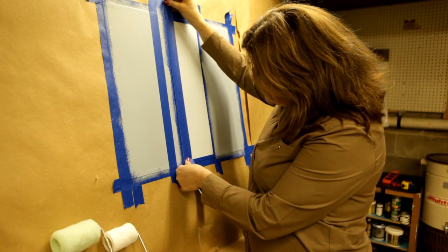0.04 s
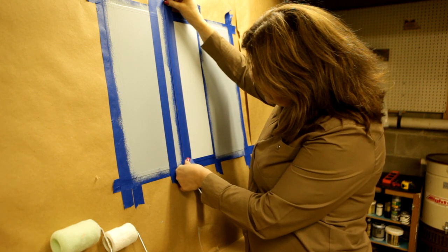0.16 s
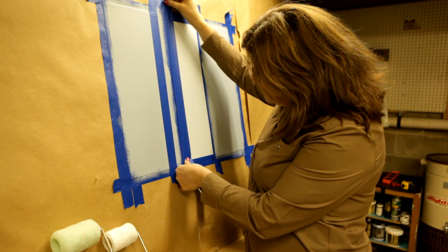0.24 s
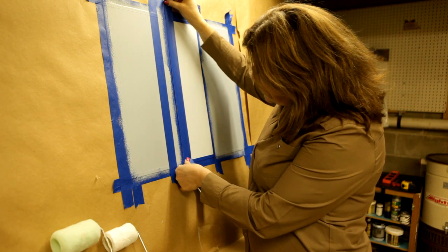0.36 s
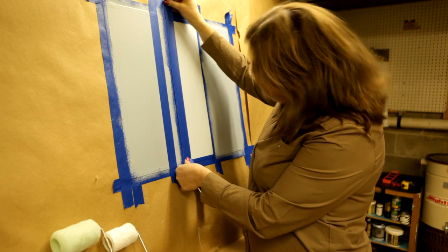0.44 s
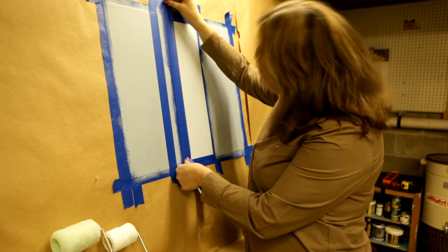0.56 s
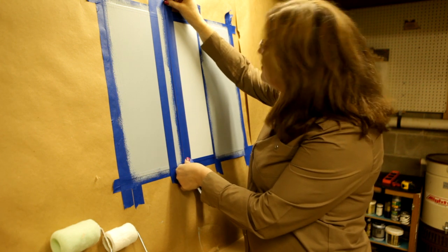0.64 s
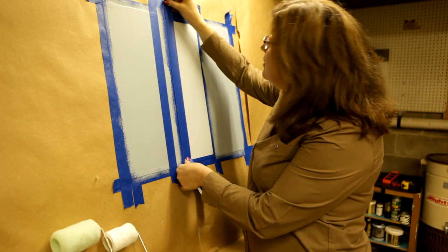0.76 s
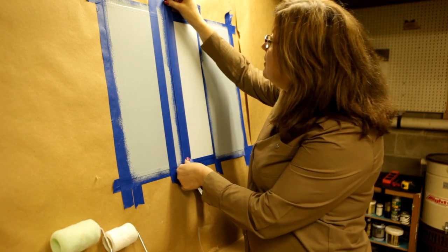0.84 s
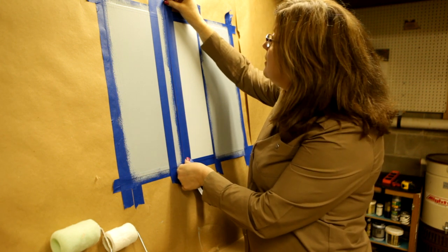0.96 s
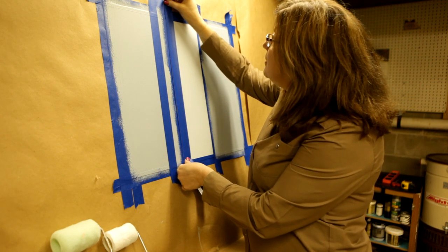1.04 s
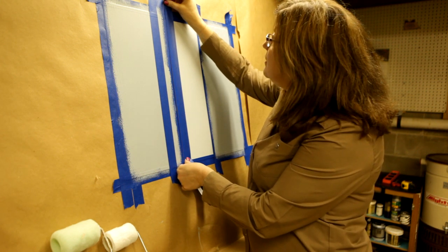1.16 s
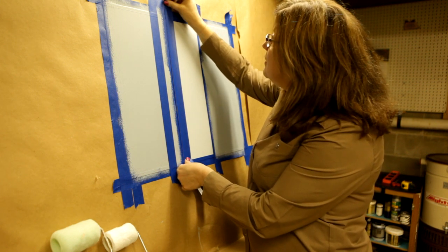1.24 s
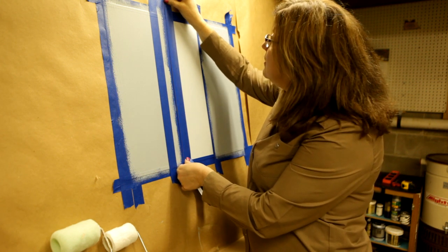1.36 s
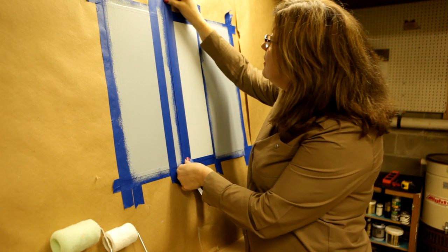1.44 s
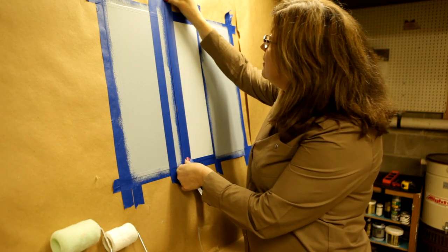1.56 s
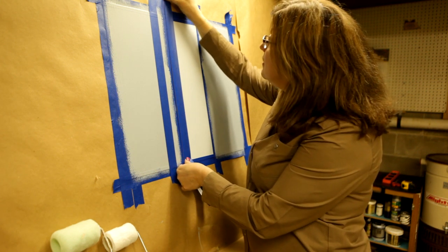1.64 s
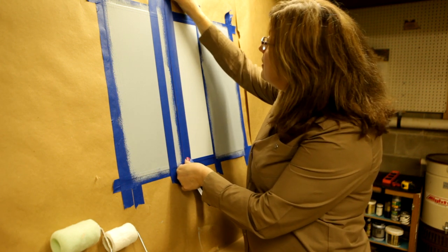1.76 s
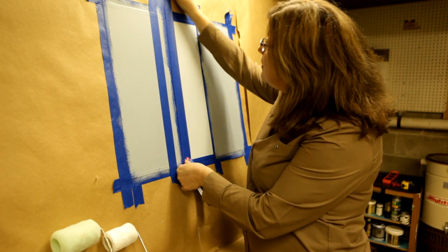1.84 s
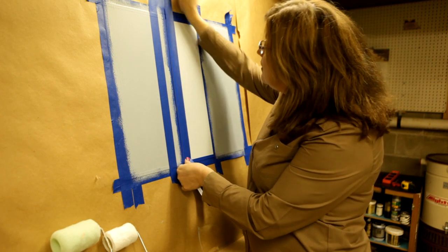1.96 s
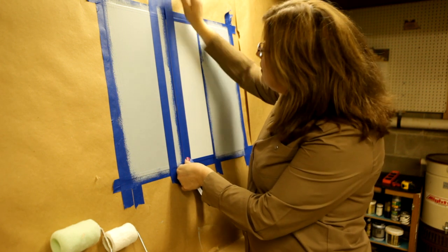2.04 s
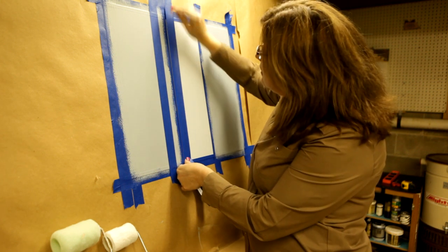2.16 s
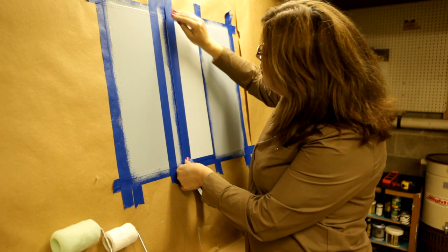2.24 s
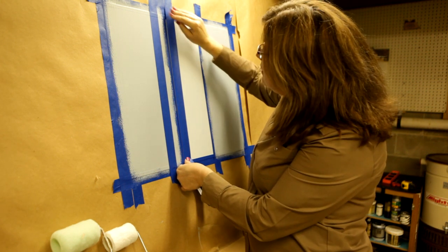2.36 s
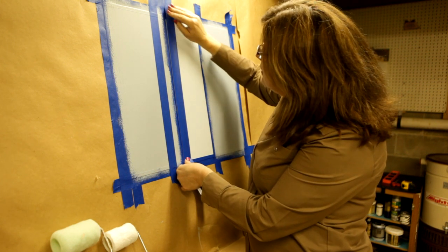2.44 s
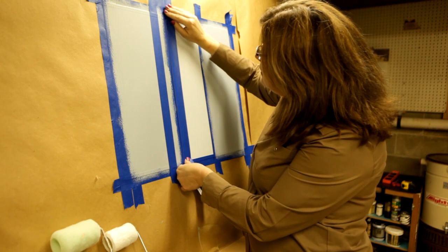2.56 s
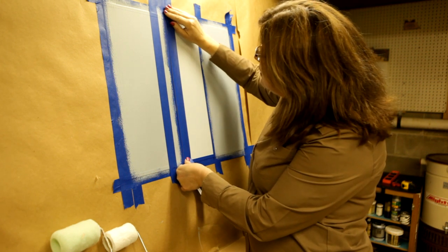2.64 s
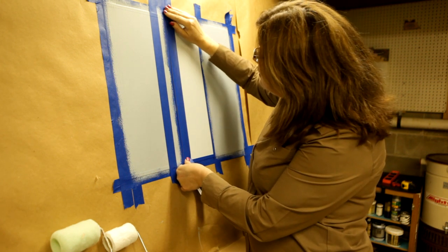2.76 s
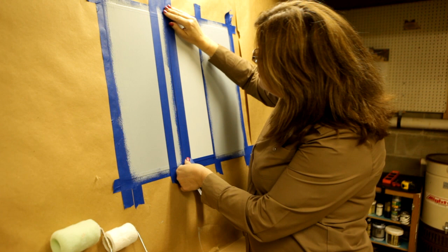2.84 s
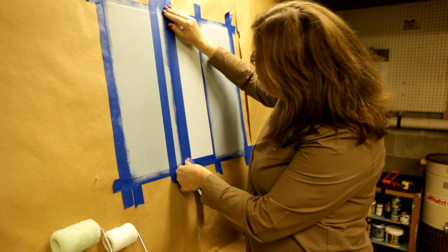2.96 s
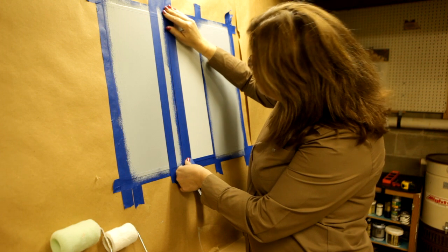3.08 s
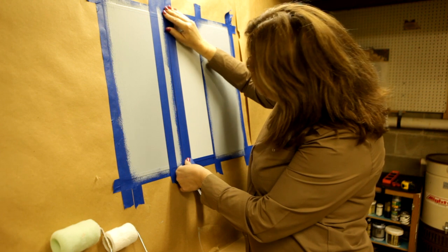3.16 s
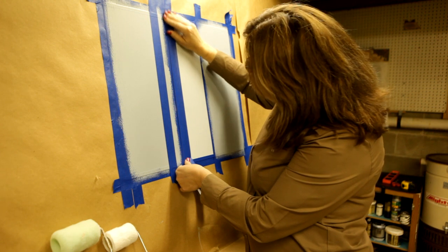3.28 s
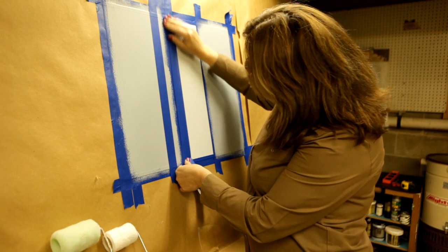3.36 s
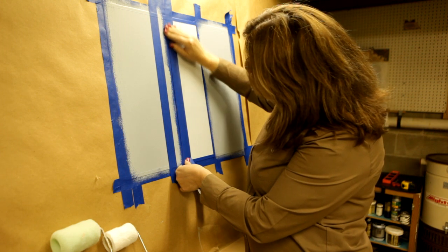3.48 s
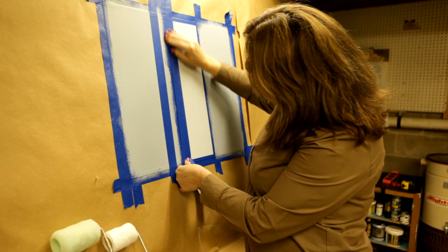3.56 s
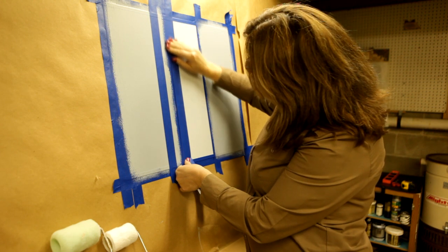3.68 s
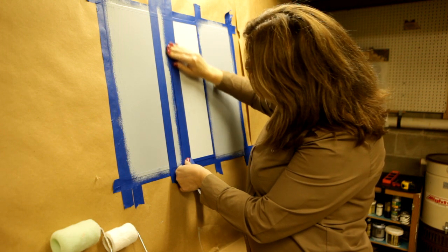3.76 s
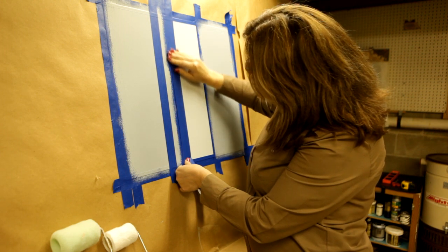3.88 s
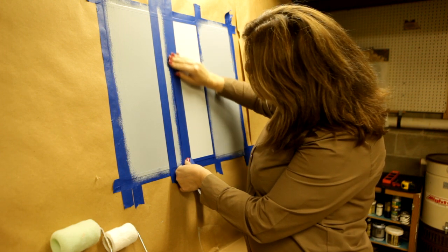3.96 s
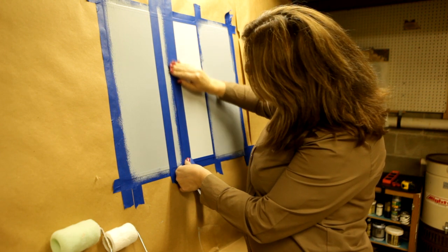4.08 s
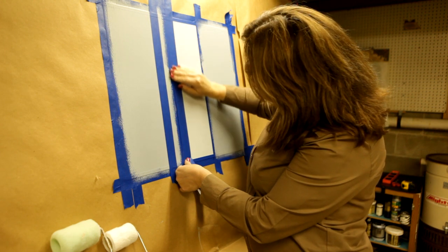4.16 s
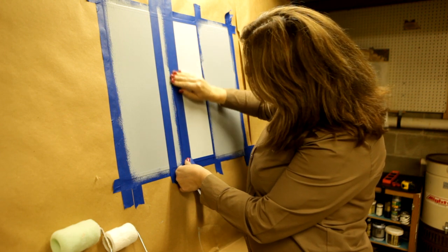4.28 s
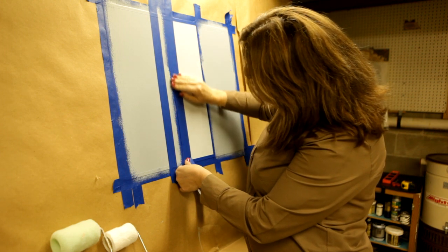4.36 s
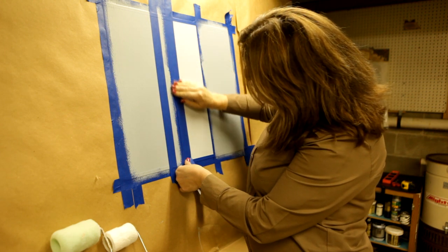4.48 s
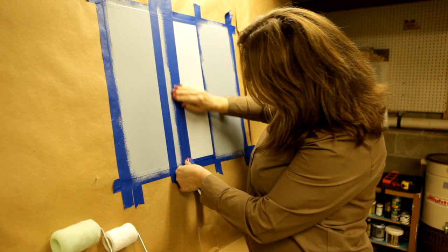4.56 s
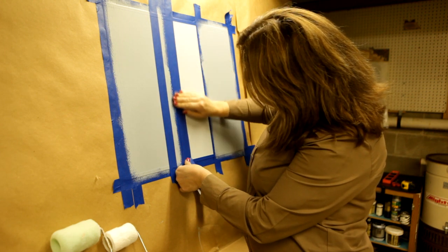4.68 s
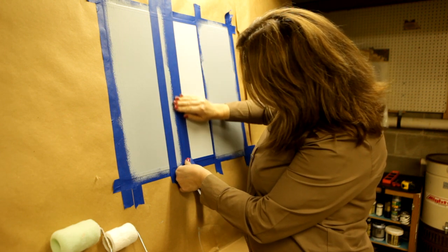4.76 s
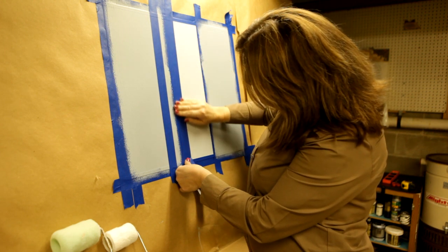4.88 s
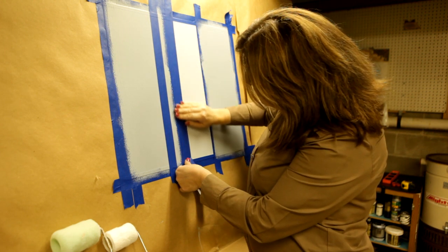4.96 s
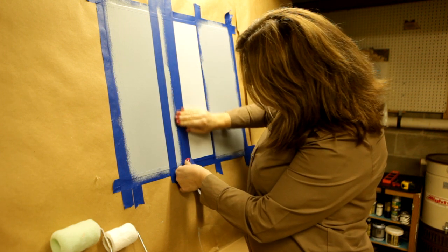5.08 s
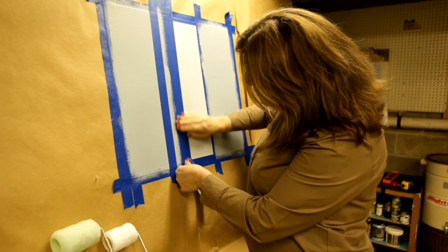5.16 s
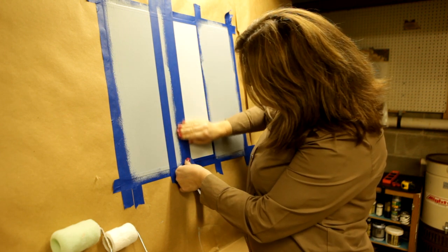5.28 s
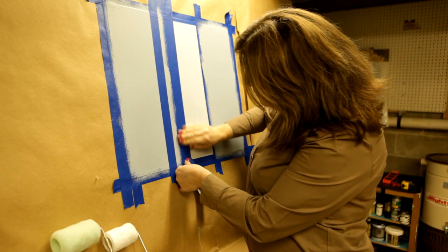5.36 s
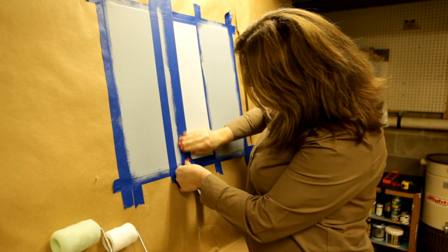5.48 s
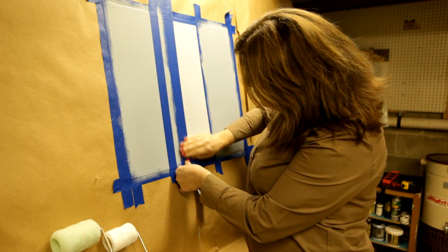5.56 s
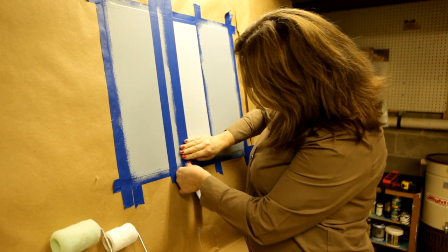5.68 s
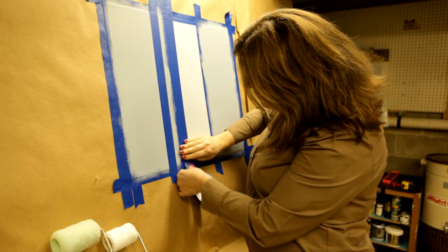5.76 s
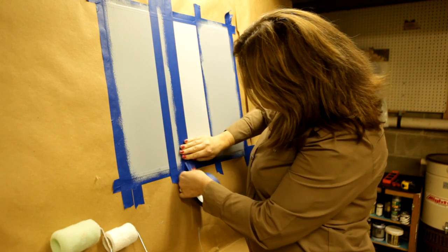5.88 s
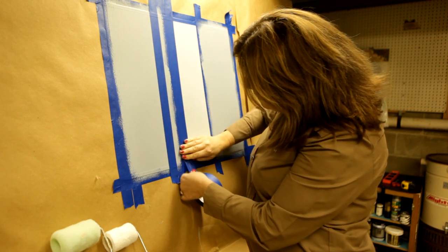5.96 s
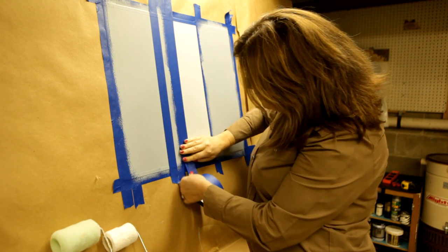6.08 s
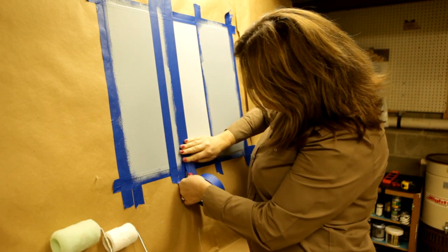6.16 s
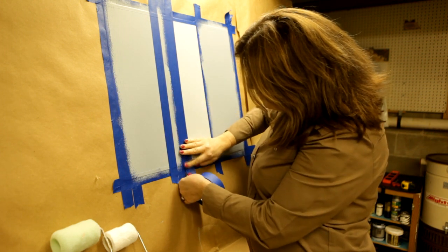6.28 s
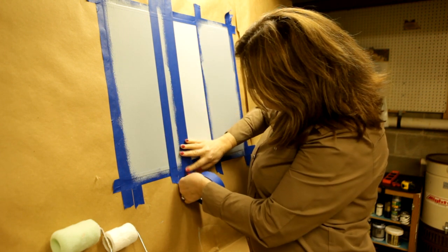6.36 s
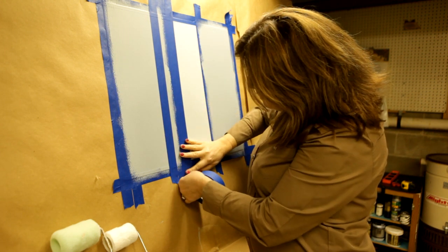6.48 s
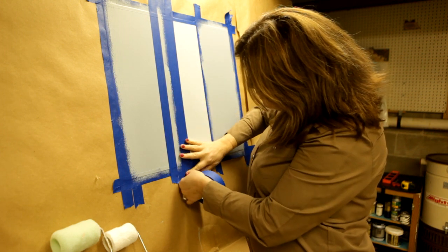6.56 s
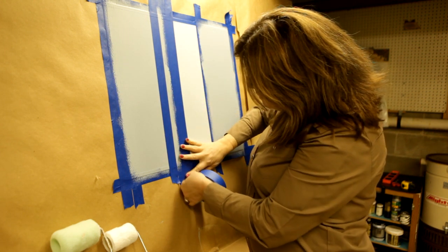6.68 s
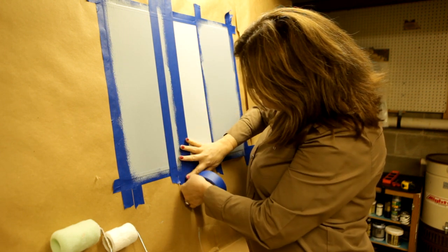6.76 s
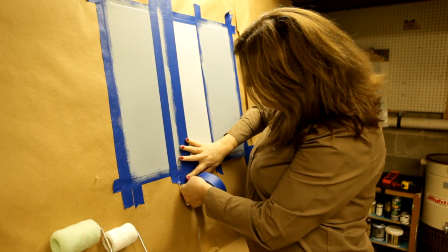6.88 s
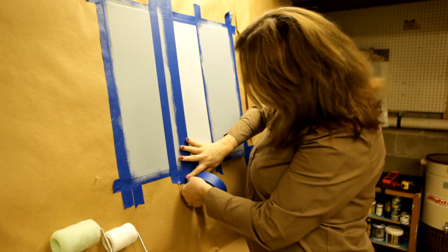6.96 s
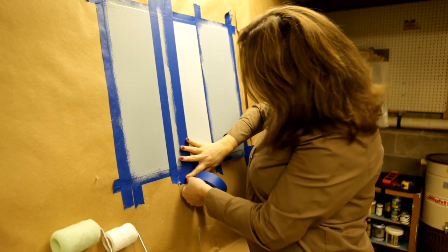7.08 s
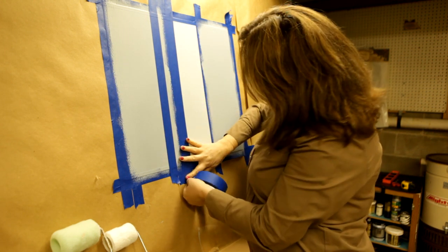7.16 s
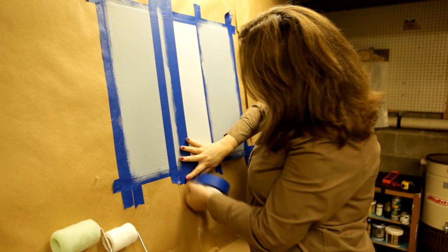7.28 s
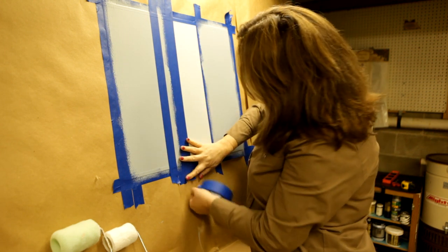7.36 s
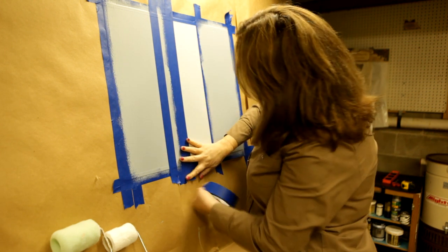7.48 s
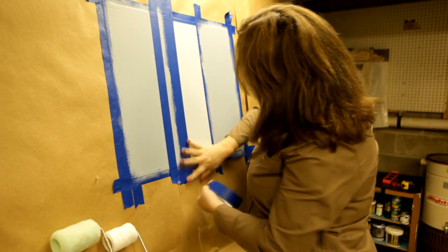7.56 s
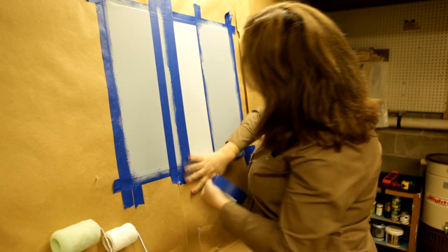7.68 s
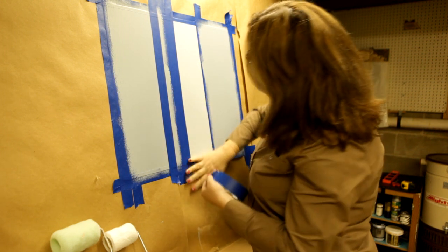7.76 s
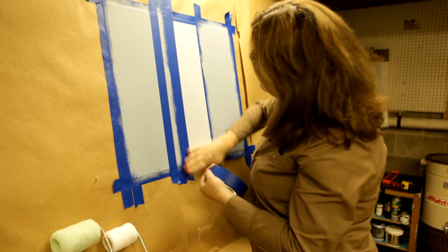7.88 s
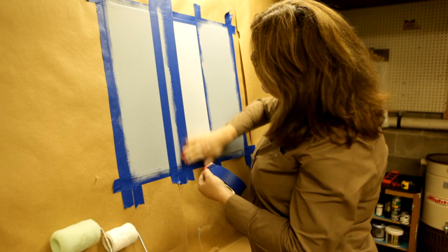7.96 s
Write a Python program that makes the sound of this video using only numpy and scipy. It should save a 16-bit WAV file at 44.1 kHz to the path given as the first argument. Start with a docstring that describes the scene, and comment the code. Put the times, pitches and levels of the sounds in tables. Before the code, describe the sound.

In a quiet basement workshop, a hand touches and presses masking tape with small sticky ticks and soft wall knocks, then rubs down it in one long dry swish. A sharp click pops, short rubs follow, and the tape tears with a quick crisp rip. Final scuffs grow louder. A mono microphone a few steps away picks up faint hum and hiss.

```python
"""A hand smooths paper masking tape down a hollow wall in a basement workshop; then the tape tears.
Rubbing: one stream of noise and slips drives the colours of skin, wall board, palm and grit.
Tape: glue snaps and parting fibres are ticks with a short ring; the tear rings two modes of the strip.
Wall: knocks ring the board's modes and a low mode drones. Behind: paper crackle, air, hiss and hum.
A mono microphone with gain control listens from a few steps away."""
import sys
import numpy as np
from scipy import signal
from scipy.io import wavfile
from scipy.ndimage import uniform_filter1d, minimum_filter1d

SR = 44100
rng = np.random.default_rng(int(sys.argv[2]) if len(sys.argv) > 2 else 0)


def put_to_file(sound):
    """Save the sound as 16-bit audio at rate SR, in the file named by the first command-line argument."""
    columns = np.atleast_2d(sound).T  # one column per channel
    safe = np.clip(columns, -1, 1)
    whole_steps = np.round(safe * 32767)
    wavfile.write(sys.argv[1], SR, whole_steps.astype(np.int16))


N = 354123

# Colour of skin on crepe paper. Each row: frequency in Hz, relative level in dB.
SKIN_COLOUR = [(1470, -34.5), (2500, -11.5), (2800, -7.5), (3200, -4.5), (4050, -4), (7540, 1.5),
               (8690, -3), (11000, -24.5), (14300, -48), (22000, -120)]
# Colour of the wall board under the hand. Each row: frequency in Hz, relative level in dB.
BOARD_COLOUR = [(50, -29), (110, 11), (250, 11.5), (500, 14.5), (850, 8), (1200, -2.5), (1800, -41)]
# Colour of the palm's broad contact. Each row: frequency in Hz, relative level in dB.
PALM_COLOUR = [(350, -39), (750, 0), (1200, -1.5), (2000, 3), (3000, 7), (4500, -12)]
# Colour of the finest paper ridges. Each row: frequency in Hz, relative level in dB.
GRIT_COLOUR = [(8000, -10), (9500, 6.5), (10800, 3.5), (13000, 3), (14300, 4), (15200, -35), (16000, -27.5)]
# Long stroke down the strip. Each row: time in seconds, friction in dB, palm contact in dB re friction.
LONG_STROKE = [(3.1, -69, -12), (3.16, -59, -5), (3.18, -50.5, -8), (3.28, -38, -14), (3.58, -37.5, -11.5),
               (3.89, -43.5, -11.5), (4.1, -39.5, -13.5), (4.29, -46.5, -10), (4.36, -41.5, -13),
               (4.71, -41, -13.5), (4.85, -46.5, -10.5), (5.04, -41, -11), (5.31, -38.5, -12.5),
               (5.44, -43, -9), (5.55, -38.5, -14.5), (5.62, -41, -5.5)]
# Short touches. Each row: peak time, rise and fall in seconds (to 10 dB under the friction peak),
# friction in dB, palm contact in dB re friction, grit in dB re friction.
TOUCHES = [(.03, 0.015, .05, -59, -15, -17), (.19, 0.08, 0.056, -55, -11, -21),
           (.39, 0.089, 0.051, -58.5, -18, -20), (.515, 0.11, 0.14, -53.5, -4, -23),
           (.75, 0.053, 0.25, -59, -8, -14), (1.125, 0.041, 0.055, -40.5, -12, -17),
           (1.222, 0.048, 0.017, -42.5, -10, -9), (1.278, 0.029, 0.08, -42.5, -6, -24),
           (1.515, 0.015, 0.23, -45, -9.5, -20), (1.875, .16, 0.088, -36.5, -8, -21),
           (2.1, 0.23, 0.2, -54, -6, -20), (2.63, .1, .1, -60.5, -7, -15),
           (2.86, .08, .08, -63.5, -3.5, -8), (3.08, .06, 0.08, -58.5, -6, -13),
           (5.675, .04, 0.075, -42, -6, -22), (5.77, .07, 0.096, -36, -11, -33),
           (5.85, 0.053, 0.25, -38.5, -14.5, -20), (5.98, 0.029, 0.037, -33, -10.5, -22),
           (6.1, .1, 0.073, -35.5, -18, -18), (6.2, 0.0089, 0.21, -52, -8, -21),
           (6.385, 0.11, 0.041, -44, -13, -14), (6.585, 0.073, 0.059, -44.5, -7, -22),
           (6.75, 0.073, 0.088, -33, -13, -15), (7.03, 0.059, 0.31, -47.5, -5, -31),
           (7.46, 0.16, .1, -49, -7.5, -22), (7.6, 0.046, 0.087, -31, -13, -15),
           (7.691, 0.067, 0.033, -32, -14.5, -14.5), (7.85, .1, 0.061, -34, -11, -15),
           (7.94, 0.1, .08, -31, -18, -17), (8.02, 0.074, .05, -22, -23, -16.5)]
TOUCH_ROUNDNESS = 1.35
STROKE_GRIT_DB, STROKE_REF_DB, GRIT_DB_PER_DB = -15.5, -41, .6
# Share of a touch's swing in dB; the board also rumbles as the palm leans in.
BOARD_FOLLOW, PALM_FOLLOW, GRIT_FOLLOW = 0.55, 0.71, 1.25
BOARD_DB_PER_PALM_DB = 2.18

# Glue lets go. Each row: start in seconds, relative ring peak in dB, ring in Hz.
GLUE_SNAPS = [(.458, -39.5, 2730), (.512, -40, 6000), (.734, -47, 6440), (1.0674, -30.5, 7000),
              (1.2164, -25.5, 6200), (1.2186, -36, 3530), (1.2533, -18, 5800), (1.2552, -20, 5300),
              (1.2578, -26, 5600), (1.2602, -27, 7500), (1.3176, -32.5, 5750), (1.507, -36, 5640),
              (1.7605, -32, 2930), (2.325, -44, 7600), (5.6925, -18, 5850), (5.696, -21, 4000),
              (5.9466, -27, 7000), (5.9478, -25, 7500), (5.9492, -3.5, 6300), (5.9526, -7, 7100),
              (6.1905, -31, 4850), (6.6189, -28, 5950), (6.6224, -30, 3950), (6.939, -35, 7050),
              (7.2367, -16, 7260), (7.5428, -29, 6350), (7.8402, -28, 7100)]
# Paper fibres part. Each row: start in seconds, relative ring peak in dB, ring in Hz.
FIBRE_SNAPS = [(7.2327, -22, 7350), (7.2402, -17, 7600), (7.267, -10, 4050), (7.2701, -9, 6000),
               (7.288, -10.5, 4200), (7.303, -12, 6350), (7.3063, -13, 6800)]
# Colour of the wide tick in a snap. Each row: frequency in Hz, relative level in dB.
TICK_COLOUR = [(100, -58), (600, -22), (1700, -12), (3000, -6), (4500, -0.5), (6700, 4.5), (10000, -6.5),
               (12000, -10.5), (15500, -13.5)]
GLUE_TICK_DB, FIBRE_TICK_DB = 1.5, -8.5  # tick energy re ring
# The tape tears. Each row: time in seconds, relative force in dB, low ring of the free strip in
# dB re force, high ring in Hz.
TEAR = [(7.223, -25, -12, 7600), (7.228, -23.5, -19, 7640), (7.245, -24.5, -19, 7600),
        (7.262, -20.5, -6, 6800), (7.267, -26.5, 1, 6040), (7.276, -21, -9, 6300), (7.29, -23.5, 1, 6400),
        (7.308, -20.5, -7, 6500), (7.313, -28, -4, 6700)]
# Colour of the tear's noise. Each row: frequency in Hz, relative level in dB.
TEAR_COLOUR = [(100, -40), (250, -19), (800, -16), (1400, -11), (2100, -13), (3000, -7), (6000, -16.5),
               (9000, -8.5), (11000, -12.5), (15500, -18)]
STRIP_HZ = 4030
TAPE_DB = 3  # gain on snaps, fibres and tear

# Hand, nail or roll knocks the wall. Each row: start in seconds, relative level in dB,
# best excited frequency in Hz (harder is higher).
KNOCKS = [(.46, -44.5, 705), (0.51, -39, 524), (.545, -47, 418), (.935, -48, 550), (1.218, -35, 1710),
          (1.254, -31, 1510), (1.262, -46, 200), (1.299, -38.5, 152), (1.505, -37, 442), (1.511, -37, 71),
          (1.538, -35, 209), (1.61, -40, 201), (5.62, -43, 90), (5.691, -37, 75), (5.693, -25, 1380),
          (5.949, -39, 250), (6.62, -27, 1450), (6.665, -36.5, 250), (6.69, -40, 120), (6.729, -35, 1300),
          (6.78, -33, 1300), (6.938, -33, 151), (7.01, -33, 577), (6.985, -39.5, 400), (7.045, -32, 645),
          (7.075, -39.5, 250), (7.1, -43, 500), (7.225, -31, 247), (7.543, -38, 205)]
# Modes of the board. Each row: frequency in Hz, relative level in dB, t60 in seconds.
WALL_MODES = [(72, -1, 0.33), (100, 2, 0.29), (147, -0.2, 0.3), (209.7, -4.4, 0.44), (273, 2, 0.24),
              (436, 1.8, 0.18), (509, -5.3, 0.19), (695, -1, 0.29), (1381, -6, 0.15), (1630, 4.5, .05)]
MODE_OCTAVE_LOSS_DB = 19  # a mode one octave off is this much weaker
# Board drone under the long stroke. Each row: time in seconds, level in dB.
DRONE = [(3.5, -72), (4.4, -64.5), (4.76, -58.5), (4.9, -68.5), (5.4, -63), (5.6, -67)]
DRONE_HZ, DRONE_RISE_HZ_PER_S = 344, 31

# Decay of the room. Each row: frequency in Hz, t60 in seconds.
ROOM_T60 = [(200, 0.43), (1500, 0.51), (6000, 0.38), (13000, 0.26)]
# Near surfaces. Each row: delay in seconds, reflection in dB.
ECHOES = [(.0012, -14.5), (.0058, -10.5), (.0075, -29.5), (0.0107, -18), (0.0137, -12), (.0165, -30),
          (0.021, -8)]
CRACKLES_PER_S, CRACKLE_DB = 30, -67.5
# Colour of room air and microphone hiss. Each row: frequency in Hz, relative level in dB.
AIR_COLOUR = [(20, -5), (36, -2), (70, 2.5), (119, 1), (173, -4.5), (313, -8.5), (722, -13), (1410, -13.5),
              (3000, -16), (6730, -12), (9500, -19.5), (13200, -23.5), (14200, -62)]
AIR_DB = -58.5  # rms before mottling
# Mains hum and motor. Each row: frequency in Hz, level in dB, rms waver in dB.
HUM = [(41, -67, -1), (120.3, -68, 0), (243, -70.5, 2.5), (293, -79.5, 4.5), (348, -73.5, 0.5),
       (483, -76.5, 2), (590, -85, 6.5), (711, -75.5, -3.5)]
CEILING, EDGE_HZ = .8, 15600


def amp(db):
    """Amplitude of a level in dB."""
    return 10 ** (np.asarray(db) / 20)


def evened(x):
    """Scale to rms 1."""
    return x / np.sqrt(np.mean(x ** 2) + 1e-20)


def read(points, hz):
    """Interpolate a table over log frequency."""
    f, value = np.transpose(points)
    return np.interp(np.log(hz + 1), np.log(f + 1), value)


def add(mix, start_s, sound):
    """Add a sound in place, cut at the end of the mix."""
    part = mix[round(start_s * SR):][:len(sound)]
    part += sound[:len(part)]


def coloured(x, points):
    """Causal minimum-phase filter with the given spectrum; rms 1."""
    hz = abs(np.fft.fftfreq(8192, 1 / SR))
    log_gain = np.log(amp(np.maximum(read(points, hz), -90)))
    taps = np.fft.ifft(np.exp(np.conj(signal.hilbert(log_gain)))).real[:4096]
    return evened(signal.oaconvolve(x, taps)[:len(x)])


def resonate(x, hz, width_hz):
    """A resonance of gain 1 that follows the curve hz: shift to 0 Hz, smooth, shift back."""
    turn = np.exp(2j * np.pi * np.cumsum(hz * np.ones(len(x))) / SR)
    r = np.exp(-np.pi * width_hz / SR)
    return 2 * (turn * signal.lfilter([1 - r], [1, -r], x / turn)).real


def drift(count, seconds):
    """Slow chance of rms 1: noise averaged twice."""
    size = max(int(seconds * SR), 1)
    return evened(uniform_filter1d(uniform_filter1d(rng.standard_normal(count), size), size))


def slips(count, per_s, spread_db, share):
    """Hiss mixed with tiny separate slips of uneven size; share is the slips' power."""
    size = amp(spread_db * np.minimum(rng.exponential(1, count), 5)) * rng.choice([-1, 1], count)
    separate = evened(size * (rng.random(count) < per_s / SR))
    return np.sqrt(1 - share) * rng.standard_normal(count) + np.sqrt(share) * separate


def mottled(x, patchy_db, frames, bins):
    """Shift the colour in random patches of time and frequency."""
    z = signal.stft(x, nperseg=512)[2]
    patches = uniform_filter1d(rng.standard_normal(z.shape[::-1]), frames, 0)
    patches = uniform_filter1d(patches, bins, 1)
    return signal.istft(z * amp(patchy_db * evened(patches).T), nperseg=512)[1][:len(x)]


def contact(t):
    """Gains of skin, board, palm and grit: the long stroke plus every touch, summed as power."""
    s, stroke_db, stroke_palm_db = np.transpose(LONG_STROKE)
    outside_s = np.maximum(np.maximum(s[0] - t, t - s[-1]), 0)
    level_db = np.interp(t, s, stroke_db) - 200 * outside_s
    stroke_grit_db = STROKE_GRIT_DB + GRIT_DB_PER_DB * (level_db - STROKE_REF_DB)
    rows = [(level_db, 0, np.interp(t, s, stroke_palm_db), stroke_grit_db)]
    for peak_s, rise_s, fall_s, db, palm_db, grit_db in TOUCHES:
        away = np.where(t < peak_s, (peak_s - t) / rise_s, (t - peak_s) / fall_s)
        rows.append((db, -10 * away ** TOUCH_ROUNDNESS, palm_db, grit_db))
    power = 0
    for db, swing_db, palm_db, grit_db in rows:
        parts_db = np.array([swing_db + 0 * t,
                             BOARD_FOLLOW * swing_db + BOARD_DB_PER_PALM_DB * palm_db,
                             PALM_FOLLOW * swing_db + palm_db,
                             GRIT_FOLLOW * swing_db + grit_db])
        power = power + amp(db + parts_db) ** 2
    return np.sqrt(power)


def rubbing():
    """One stream of slips excites skin, board, palm and grit; pressure trembles, paper is uneven."""
    t, coarse_t = np.arange(N) / SR, np.arange(0, N, 64) / SR
    tremble_db = 0.67 * drift(N, 0.034) + .5 * drift(N, 0.002)
    drive = slips(N, per_s=3000, spread_db=0.0, share=0.25) * amp(tremble_db)
    drive = mottled(drive, patchy_db=1.4, frames=9, bins=1)
    colours = (SKIN_COLOUR, BOARD_COLOUR, PALM_COLOUR, GRIT_COLOUR)
    return sum(coloured(drive, points) * np.interp(t, coarse_t, gain)
               for points, gain in zip(colours, contact(coarse_t)))


def snap(db, hz, tick_db):
    """Glue or fibre lets go: a wide noise tick and a short ring of the paper."""
    t = np.arange(512) / SR
    swell = np.minimum(t / 0.000307, 1)
    tick = coloured(rng.standard_normal(len(t)) * swell * amp(-60 * t / 0.005), TICK_COLOUR)
    ring = np.sin(2 * np.pi * hz * t) * swell * amp(-60 * t / 0.0022)
    ring /= abs(ring).max()
    tick *= np.linalg.norm(ring) / np.linalg.norm(tick)
    return amp(db) * (ring + amp(tick_db) * tick)


def tearing():
    """Fibres part in clumps and ring two modes of the free strip; returns start and sound."""
    s, force_db, low_db, high_hz = np.transpose(TEAR)
    t = np.arange(s[0], s[-1], 1 / SR)
    drive = slips(len(t), per_s=3500, spread_db=1.5, share=0.26) * amp(2.1 * drift(len(t), 0.0031))
    low = evened(resonate(drive, STRIP_HZ, 480)) * amp(np.interp(t, s, low_db))
    high = evened(resonate(drive, np.interp(t, s, high_hz), 1250)) * amp(1.0)
    sound = (amp(-1.5) * coloured(drive, TEAR_COLOUR) + low - high) / np.sqrt(2)
    return s[0], amp(np.interp(t, s, force_db)) * sound * signal.windows.tukey(len(t), .02)


def thud(db, hz, t60_s):
    """One board mode booms briefly: a damped sine plus a rattle of noise around it."""
    t = np.arange(int(.3 * SR)) / SR
    rattle = evened(resonate(rng.standard_normal(len(t)), hz, 0.68 * hz))
    fade = amp(-60 * t / max(t60_s, .01)) * np.minimum(t / 0.00094, 1)
    return amp(db) * fade * (0.24 * np.sin(2 * np.pi * hz * t) + 0.23 * rattle)


def knock(db, centre_hz):
    """A blow rings most the modes of the board nearest its hardness."""
    return sum(thud(db + mode_db - MODE_OCTAVE_LOSS_DB * np.log2(hz / centre_hz) ** 2, hz, t60_s)
               for hz, mode_db, t60_s in WALL_MODES)


def drone():
    """Friction noise rings a low board mode that rises as the hand moves down; start and sound."""
    s, db = np.transpose(DRONE)
    t = np.arange(s[0], s[-1], 1 / SR)
    hz = DRONE_HZ + DRONE_RISE_HZ_PER_S * (t - s[0])
    mode = evened(resonate(rng.standard_normal(len(t)), hz, 44))
    return s[0], mode * amp(np.interp(t, s, db)) * signal.windows.tukey(len(t), .1)


def crackle():
    """The loose paper ticks faintly all the while: sparse impulses, each a tiny noise burst."""
    impulses = slips(N, CRACKLES_PER_S, spread_db=2.5, share=1)
    burst = slips(130, 9000, spread_db=2.0, share=0.59)
    return amp(CRACKLE_DB) * coloured(signal.oaconvolve(impulses, burst)[:N], SKIN_COLOUR)


def room(x):
    """A few near reflections, then sparse taps that die band by band."""
    taps = np.zeros(SR // 2)
    at = np.arange(300, len(taps) - 16, 16)
    taps[at + rng.integers(0, 16, len(at))] = rng.choice([-1., 1.], len(at))
    hz, t, z = signal.stft(taps, SR, nperseg=256)
    fade = amp(-60 * t / read(ROOM_T60, hz)[:, None])
    tail = signal.istft(z * fade, SR, nperseg=256)[1]
    tail = amp(-9.5) * tail / np.linalg.norm(tail)
    for delay_s, db in ECHOES:
        add(tail, delay_s, amp([db]))
    return x + signal.oaconvolve(x, tail)[:N]


def background():
    """Room air and microphone hiss as noise; mains hum and a low motor tone as wavering sines."""
    t = np.arange(N) / SR
    air = coloured(rng.standard_normal(N), AIR_COLOUR) * amp(AIR_DB)
    sound = mottled(air, patchy_db=2.5, frames=9, bins=2)
    for hz, db, waver_db in HUM:
        level = np.sqrt(2) * amp(db + waver_db * drift(N, 0.1))
        sound = sound + level * np.sin(2 * np.pi * (hz * t + rng.random()))
    return sound


def scene():
    """Sum all layers into two equal channels; only the tape sounds pass through the room."""
    tape, wall = np.zeros(N), np.zeros(N)
    add(tape, *tearing())
    for rows, tick_db in ((GLUE_SNAPS, GLUE_TICK_DB), (FIBRE_SNAPS, FIBRE_TICK_DB)):
        for start_s, db, hz in rows:
            add(tape, start_s, snap(db, hz, tick_db))
    for start_s, db, centre_hz in KNOCKS:
        add(wall, start_s, knock(db, centre_hz))
    add(wall, *drone())
    tape = amp(TAPE_DB) * room(tape)
    return np.tile(rubbing() + tape + wall + crackle() + background(), (2, 1))


def record(dry):
    """Gain control ducks after an overload, holds, then lets go; hard ceiling; band limit."""
    hold = int(.24 * SR)
    overload = (abs(dry[0]) > .9).astype(float)
    held = -minimum_filter1d(-overload, hold, origin=(hold - 1) // 2)
    duck_db = 4.5 * signal.lfilter([.003], [1, -.997], held)
    ducked = np.clip(dry / amp(duck_db), -CEILING, CEILING)
    low_pass = signal.firwin(511, EDGE_HZ, window=("kaiser", 9), fs=SR)
    return signal.oaconvolve(ducked, low_pass[None], "same")


dry = scene()
out = record(dry)
put_to_file(out)
```